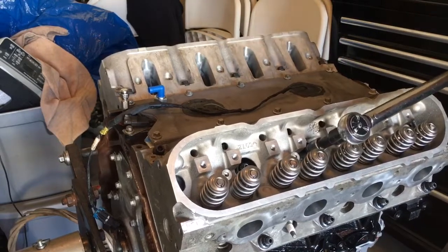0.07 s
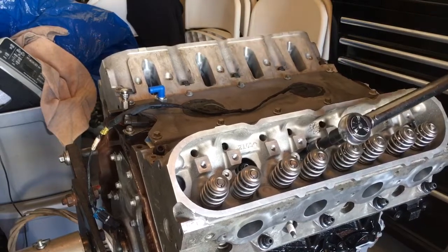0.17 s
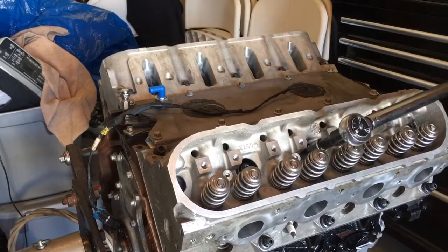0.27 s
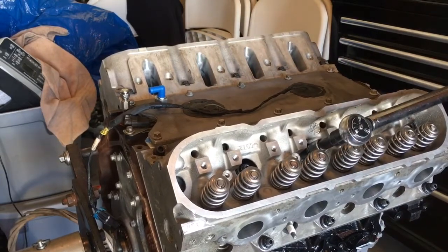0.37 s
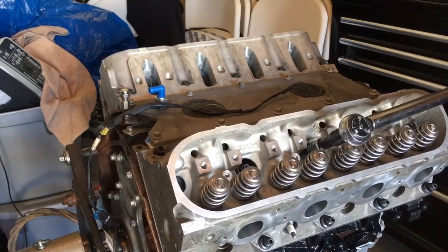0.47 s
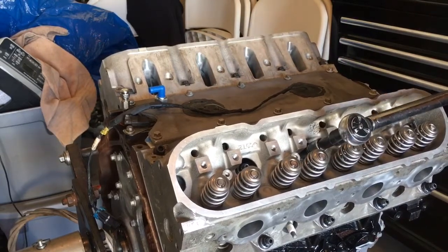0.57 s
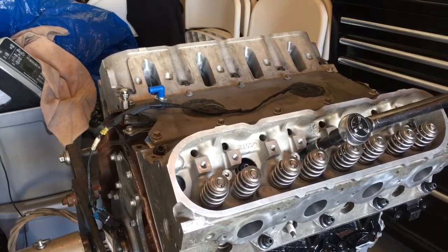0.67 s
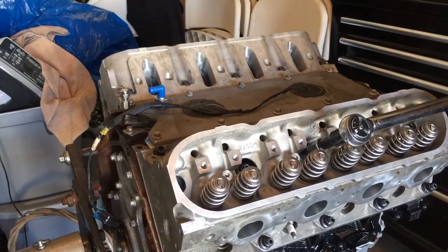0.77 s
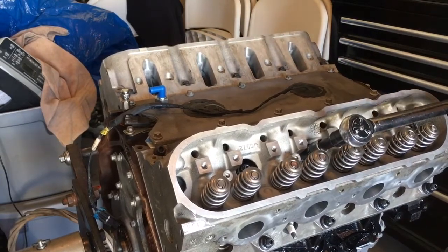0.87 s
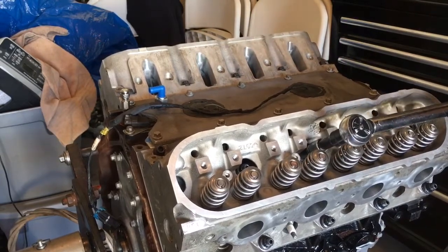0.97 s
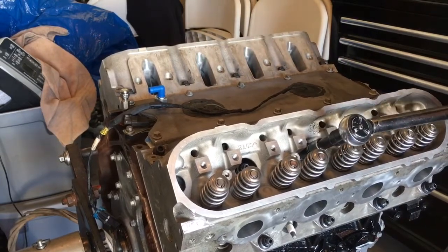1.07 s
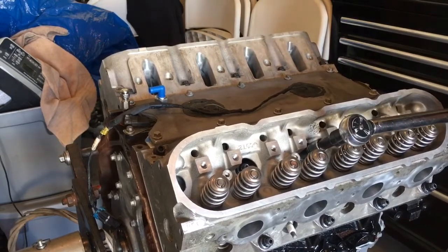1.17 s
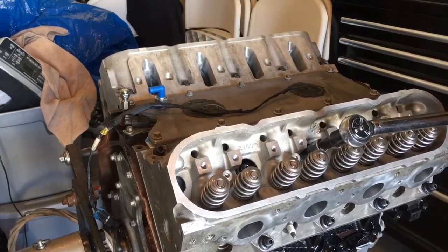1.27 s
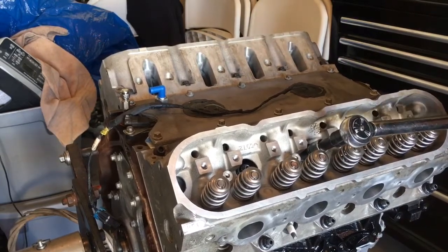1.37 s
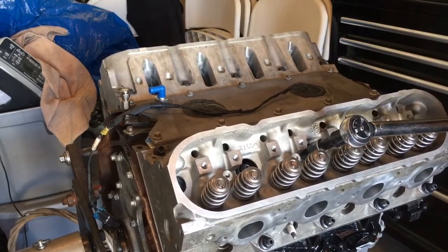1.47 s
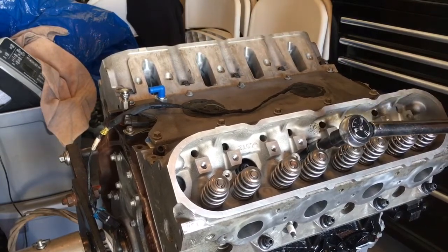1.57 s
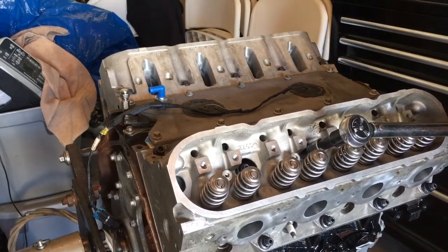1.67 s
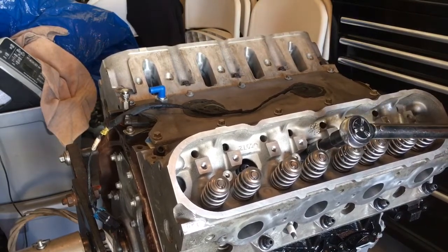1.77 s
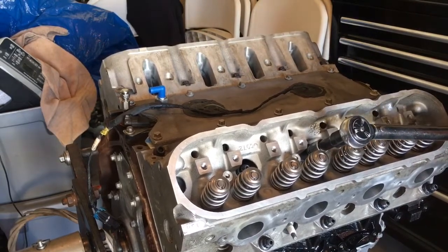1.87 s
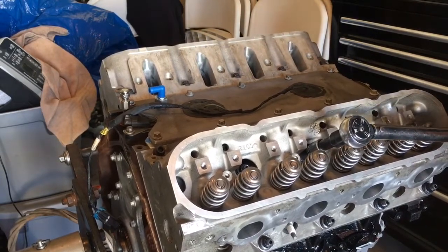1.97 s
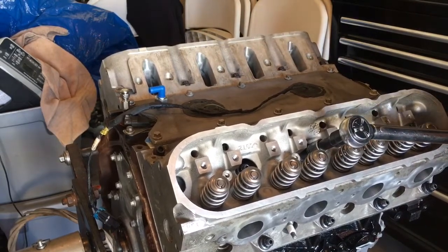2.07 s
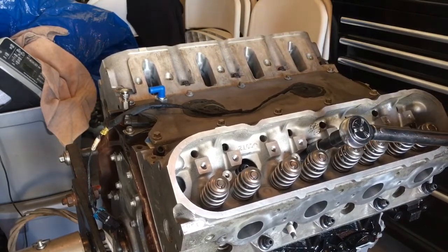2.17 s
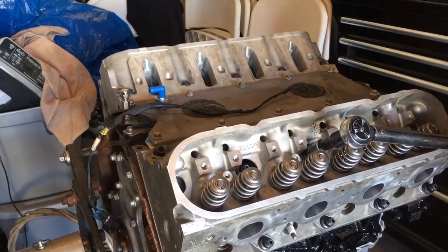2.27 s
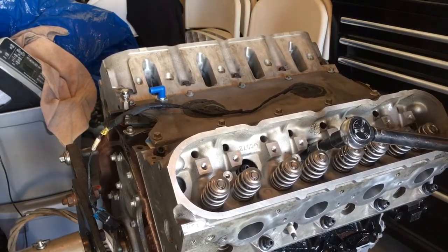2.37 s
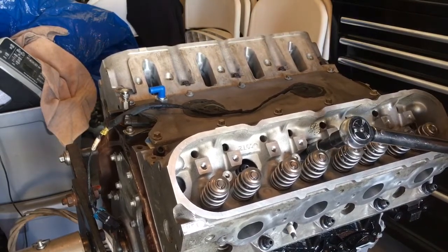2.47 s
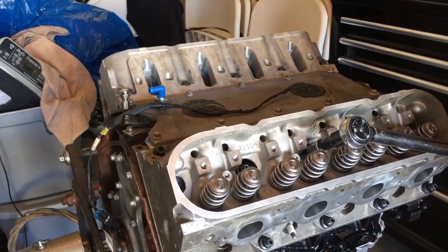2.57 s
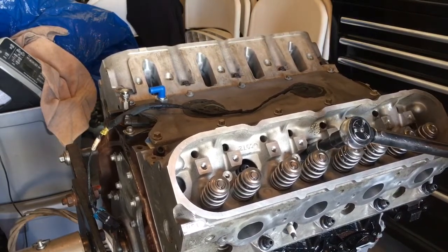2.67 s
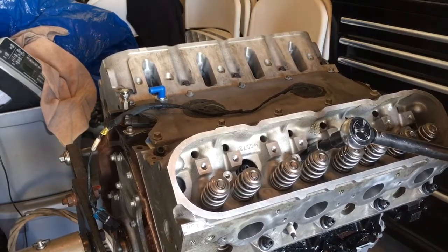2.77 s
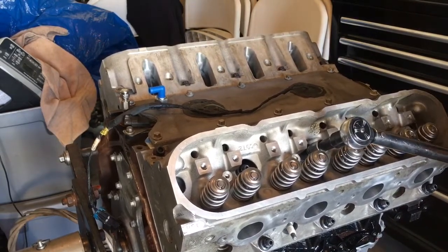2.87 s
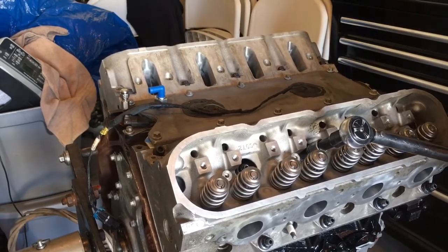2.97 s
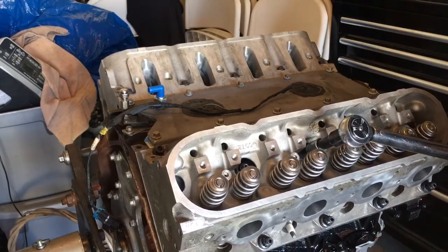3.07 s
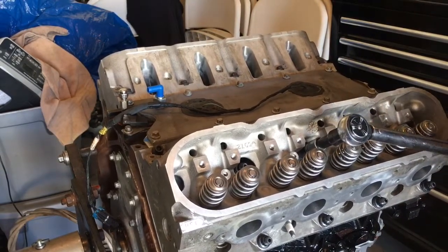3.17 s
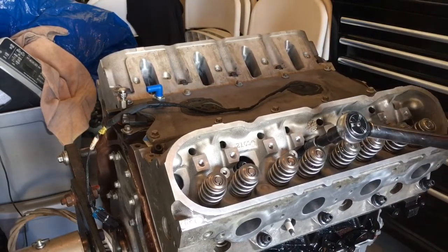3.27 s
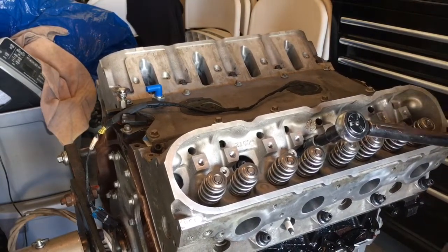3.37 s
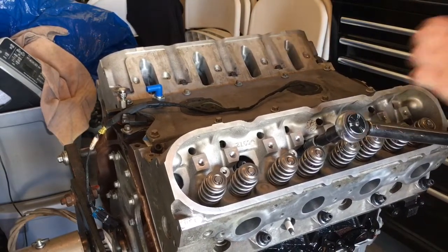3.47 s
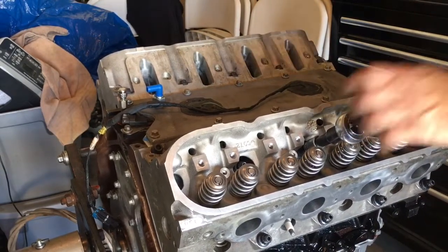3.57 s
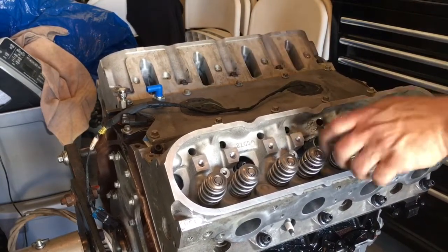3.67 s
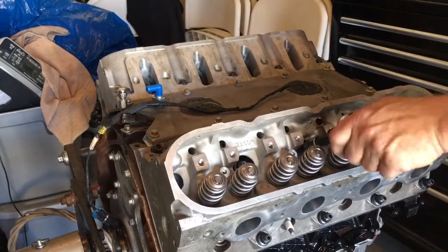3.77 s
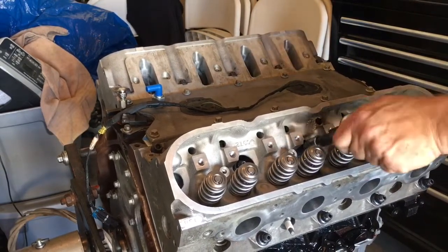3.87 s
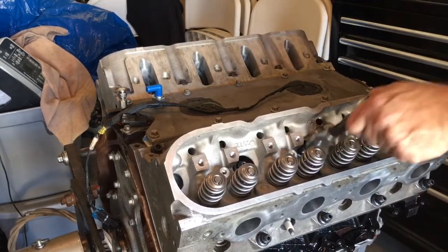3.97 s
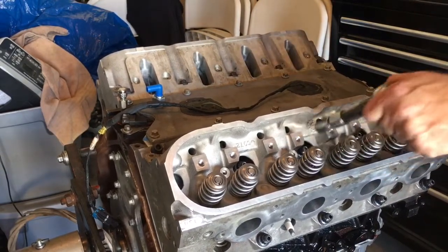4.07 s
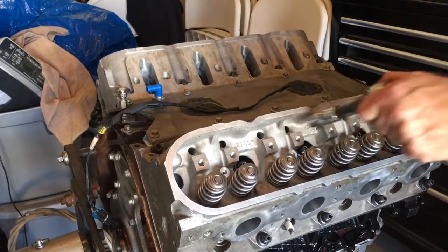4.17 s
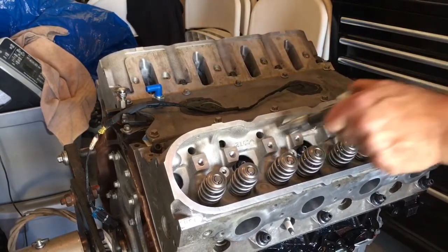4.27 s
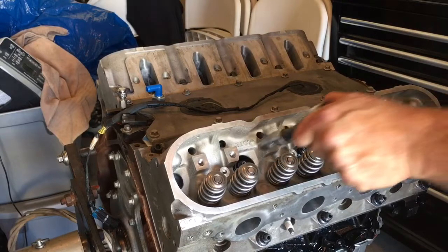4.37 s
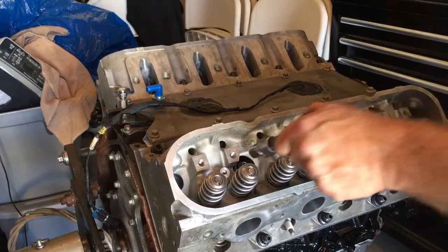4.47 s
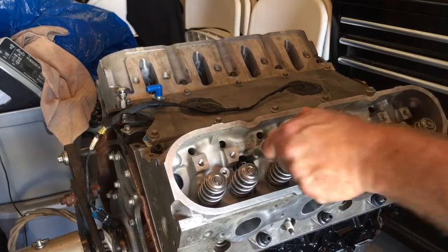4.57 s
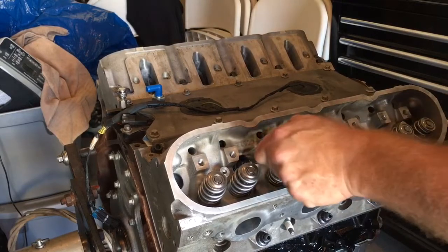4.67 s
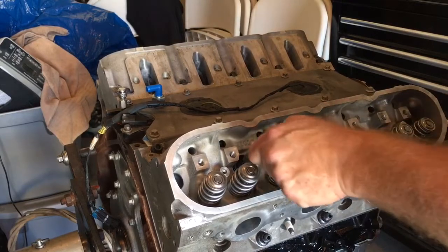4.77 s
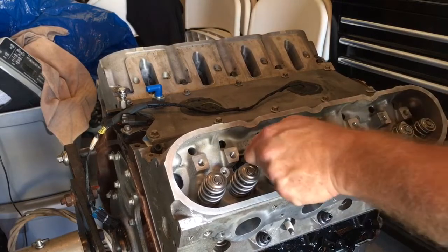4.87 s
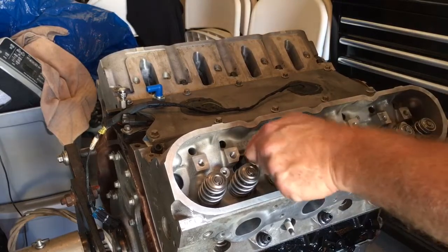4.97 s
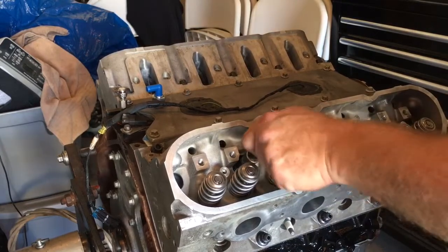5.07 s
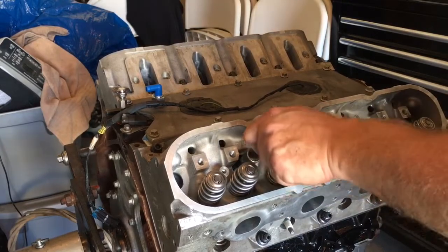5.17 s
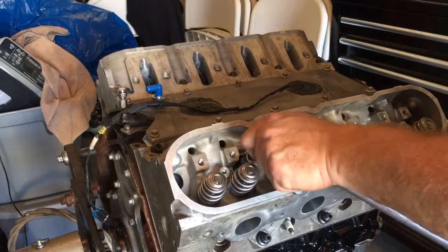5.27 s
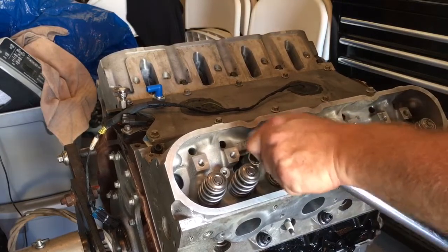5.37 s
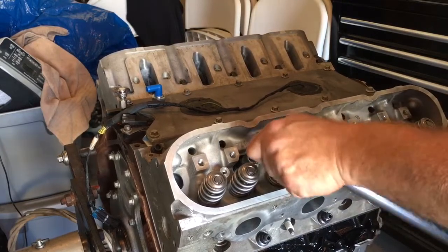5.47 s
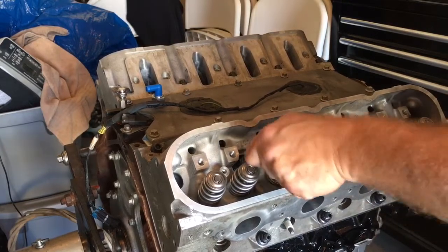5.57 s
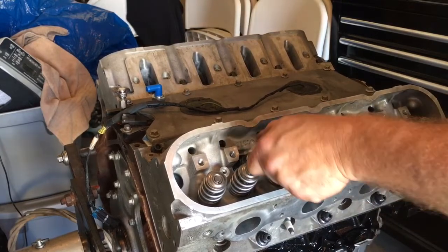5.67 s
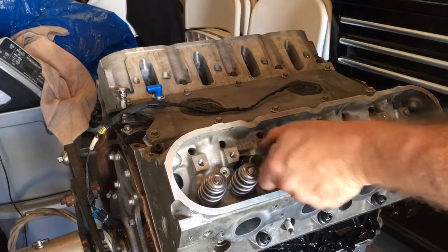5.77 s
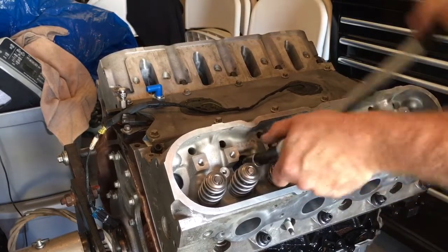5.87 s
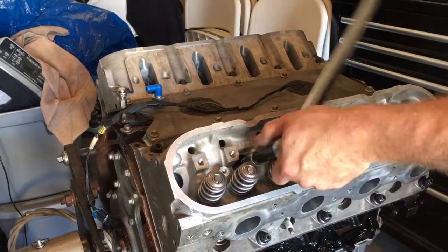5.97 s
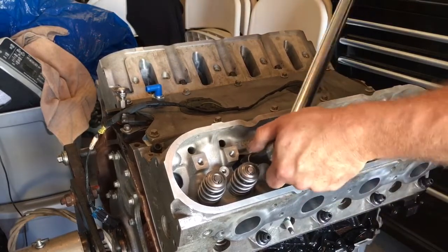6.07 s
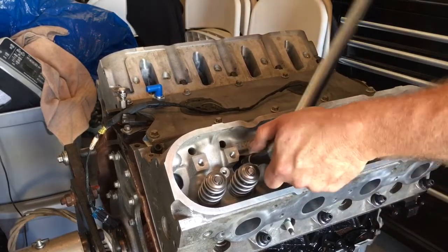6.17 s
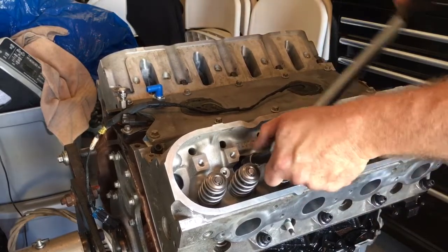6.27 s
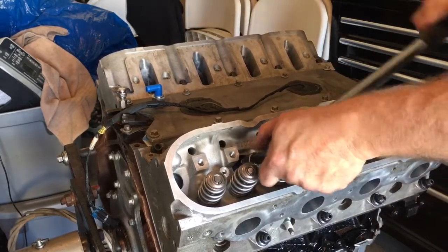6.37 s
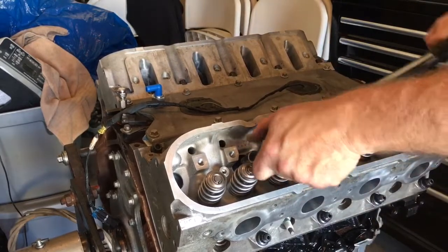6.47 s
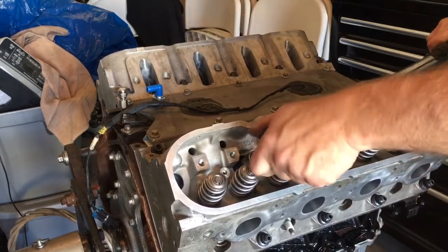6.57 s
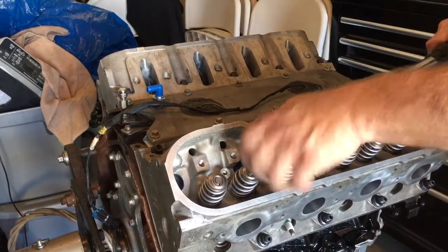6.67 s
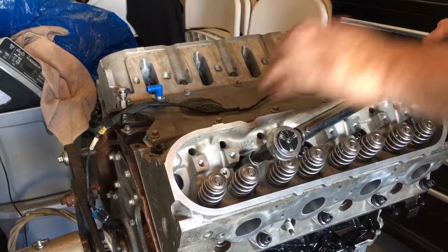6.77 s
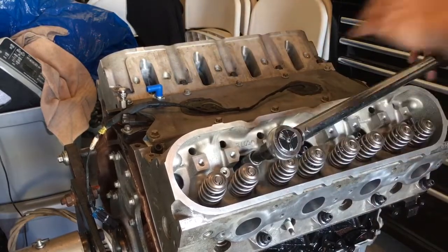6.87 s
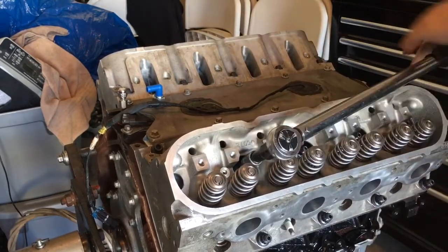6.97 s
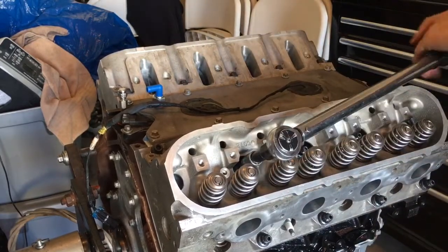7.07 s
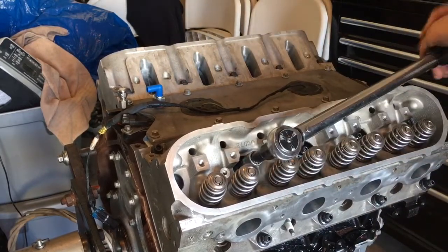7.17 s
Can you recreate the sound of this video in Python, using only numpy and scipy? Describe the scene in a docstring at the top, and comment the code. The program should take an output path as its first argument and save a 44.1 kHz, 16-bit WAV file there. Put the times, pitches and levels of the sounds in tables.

```python
"""In a garage, a low hum like an engine idling outside and a faint, high insect trill go on throughout.
At 2.8 s a click-type torque wrench, tightening a cylinder head bolt, gives way with a loud snap: its arm
slaps the inside of its steel tube. At 3.2 s it snaps back as the pull eases, and a soft hiss lingers.
From 3.7 s the socket knocks and scrapes as it is lifted off and slid onto the next bolt. At 5.8 s the
handle swings back, clicking over seven ratchet teeth. A few light rubs and a last knock follow."""
import sys
import numpy as np
from scipy import signal
from scipy.fft import rfft, irfft, next_fast_len
from scipy.io import wavfile
from scipy.ndimage import uniform_filter1d, map_coordinates

SR = 44100
rng = np.random.default_rng(int(sys.argv[2]) if len(sys.argv) > 2 else 0)


def log_audio(samples):
    """Write samples as a 16-bit WAV file to the path given in sys.argv[1]."""
    # one column per channel
    frames = np.atleast_2d(samples).T
    # limit to full scale, then quantise
    limited = np.clip(frames, -1, 1)
    pcm = np.round(limited * 32767).astype(np.int16)
    wavfile.write(sys.argv[1], SR, pcm)


N = 318402
TIME = np.arange(N) / SR
AGE = np.arange(SR // 2) / SR  # seconds since a hit

def amp(db):
    """Turn decibels into a gain."""
    return 10 ** (np.asarray(db) / 20)

def unit(x):
    """Scale a sound to an average (rms) level of 1."""
    return x / np.sqrt(np.mean(x ** 2) + 1e-20)

def along(points, hz):
    """Read between the rows of a (pitch, value) table, on a log pitch scale."""
    pitches, values = np.transpose(points)
    return np.interp(np.log(hz + 1), np.log(pitches + 1), values)

def fade(t, fade_s):
    """Die away by 60 dB every fade_s seconds."""
    return np.exp(-np.log(1000) * t / fade_s)

def swell(middle_s, length_s):
    """A flat-topped hill of height 1."""
    return np.exp(-(2 * (TIME - middle_s) / length_s) ** 4)

def wobble(rate):
    """A smooth curve through `rate` random values a second."""
    return map_coordinates(rng.standard_normal(int(N * rate / SR) + 4), [TIME * rate])

def filtered(x, response):
    """Turn each frequency up or down by the gain response(hz)."""
    size = next_fast_len(len(x) + SR // 4)
    hz = np.fft.rfftfreq(size, 1 / SR)
    return irfft(rfft(x, size) * response(hz), size)[:len(x)]

def noise(tone):
    """Noise of level 1, shaped by a (pitch_hz, level_db) table."""
    return unit(filtered(rng.standard_normal(N), lambda hz: amp(along(tone, hz))))

def band(centre_hz, width_hz):
    """Noise of level 1, gathered around one pitch."""
    peak = lambda hz: 1 / (1 + ((hz - centre_hz) / width_hz * 2) ** 2)
    return unit(filtered(rng.standard_normal(N), peak))

def tone_filter(tone, size=2048):
    """The promptest (minimum-phase) click of energy 1 with the shape tone(hz), in dB."""
    gain = np.maximum(amp(tone(np.fft.rfftfreq(size, 1 / SR))), 1e-6)
    cepstrum = irfft(np.log(gain))
    cepstrum[1:size // 2] *= 2
    cepstrum[size // 2 + 1:] = 0
    response = irfft(np.exp(rfft(cepstrum)))
    return response / np.linalg.norm(response)

def add(track, start_s, sound):
    """Mix a sound into the track."""
    part = track[round(start_s * SR):][:len(sound)]
    part += sound[:len(part)]

def clack(tone, fade_s, smooth_bins=41, rise_s=.0003, size=2048):
    """Steel hits steel: a burst of tiny impacts, evened out in tone and then shaped by tone(hz)."""
    burst = rng.choice([-1, 1], len(AGE)) * fade(AGE, fade_s) * (1 - np.exp(-AGE / rise_s))
    power = uniform_filter1d(np.abs(rfft(burst, size)) ** 2, size=smooth_bins)
    shaper = tone_filter(lambda hz: tone(hz) - 10 * np.log10(power))
    shaped = signal.fftconvolve(burst, shaper)[:len(AGE)]
    return shaped * np.linalg.norm(burst) / np.linalg.norm(shaped)

def ring(hz, fade_s, rise_s=.001):
    """One fading note of struck steel."""
    wave = np.sin(2 * np.pi * (hz * AGE + rng.random()))
    return wave * fade(AGE, fade_s) * (1 - np.exp(-AGE / rise_s))

# how long the garage echoes: pitch_hz, fade_s
ECHO_FADES = [(200, .36), (700, .33), (1700, .32), (4500, .33), (8000, .29), (12000, .28), (16000, .23)]
def garage(x, echo_db, build_s=.003):
    """Add the room's echo, which builds quickly after the sound and dies sooner in the treble."""
    hz, t, spectrum = signal.stft(rng.standard_normal(len(AGE)), SR, nperseg=256)
    spectrum = spectrum * fade(t, along(ECHO_FADES, hz)[:, None])
    tail = signal.istft(spectrum, SR)[1][:len(AGE)]
    tail *= 1 - np.exp(-(AGE / build_s) ** 2)
    return x + amp(echo_db) * signal.fftconvolve(x, tail / np.linalg.norm(tail))[:len(x)]

# tone of the room's steady noise: pitch_hz, relative_db
AIR_TONE = [(100, -25), (200, -5), (330, -2), (450, -11), (750, -15), (1100, -15.5), (1950, -17.5),
            (2400, -23), (3800, -23.5), (4800, -30), (6500, -32.5), (8500, -37), (11000, -40), (16000, -43)]
# faint whirring: pitch_hz, width_hz, level_db
WHIRRS = [(280, 22, -69.5), (626, 18, -76), (3450, 400, -81)]
def room_air(air_db=-60.5, whine_db=-77.5, swell_db=4):
    """Steady noise, some whirring and a faint whine that swells once."""
    whirr = sum(amp(db) * band(hz, width_hz) for hz, width_hz, db in WHIRRS)
    whine_gain = amp(whine_db + swell_db * swell(middle_s=1.5, length_s=1.4))
    whine = whine_gain * band(centre_hz=2040, width_hz=90)
    return amp(air_db) * noise(AIR_TONE) + whirr + whine

def insect(level_db=-80, tiring_db_per_s=-.4, flutter_db=2, trill_s=.12, gap_s=.235, slowing=.015):
    """Thin, distant trills in a loose rhythm that slowly grows sparser and fainter."""
    middle_s, trills = trill_s, np.zeros(N)
    for gap_scale, length_scale in np.exp(.18 * rng.standard_normal((32, 2))):
        trills = np.maximum(trills, swell(middle_s, trill_s * length_scale))
        middle_s += gap_scale * (gap_s + slowing * middle_s)
    gain = amp(level_db + tiring_db_per_s * TIME + flutter_db * wobble(25))
    return gain * trills * band(centre_hz=9750, width_hz=480)

# notes of the engine's hum: cycles_per_turn, level_db
HUM_NOTES = [(4, -48.5), (4.5, -57), (5, -52), (6, -60), (7, -66), (8, -56), (10, -66), (12, -55.5),
             (12.5, -66), (15, -68), (17, -73), (21, -73), (24.5, -71)]
# tone of its rumble: pitch_hz, relative_db
RUMBLE_TONE = [(20, -20), (32, -9), (48, 0), (80, -2), (130, 0), (170, -4), (210, -14), (400, -35),
               (1000, -100)]
def idling_engine(turns_per_s=11.3, drift=.008, flutter_db=2, rumble_db=-54.5):
    """A slowly turning crankshaft makes low notes that throb against each other over a soft rumble."""
    turns = np.cumsum(turns_per_s * (1 + drift * wobble(2))) / SR
    hum = np.zeros(N)
    for cycles, db in HUM_NOTES:
        gain = amp(db + flutter_db * wobble(4))
        hum += gain * np.sin(2 * np.pi * (cycles * turns + rng.random()))
    return np.sqrt(2) * hum + amp(rumble_db) * noise(RUMBLE_TONE)

# tone of steel rubbing steel: pitch_hz, relative_db
SCRAPE_TONE = [(290, -41), (500, -11), (868, -9), (1060, -2), (1260, -8), (1720, -5), (3860, -8),
               (12000, -19), (16000, -27)]
# strokes of the socket: peak_s, level_db, rise_s, fall_s
STROKES = [(3.89, -62, .025, .04), (3.985, -61, .04, .03), (4.205, -63, .015, .035), (4.67, -62, .02, .03),
           (4.803, -52, .07, .033), (6.14, -60, .025, .025), (6.385, -57.5, .022, .018),
           (6.555, -64, .008, .03), (6.65, -64, .012, .03)]
def socket_scrapes(grit_db=4):
    """The socket rubs over the bolt head, catching on its roughness; each stroke presses and lets go."""
    rub = unit(noise(SCRAPE_TONE) * amp(grit_db * wobble(350)))
    pressure = np.zeros(N)
    for peak_s, db, rise_s, fall_s in STROKES:
        width_s = np.where(TIME < peak_s, rise_s, fall_s)
        pressure += amp(db) * np.exp(-((TIME - peak_s) / width_s) ** 2)
    return garage(pressure * rub, echo_db=-3)

# tone of a knock: pitch_hz, relative_db
KNOCK_TONE = [(150, -8), (400, -4), (800, -4), (1200, 0), (1750, 2), (2300, -5), (3300, 0), (4600, -3),
              (5600, 3), (7300, -4), (8300, 0), (10500, -5), (12000, -4), (16000, -11)]
# notes of the loose socket: pitch_hz, relative_db, fade_s
SOCKET_NOTES = [(1700, -26, .15), (5330, -25, .16), (5900, -26, .14), (8170, -28, .17)]
# knocks on bolt and cylinder head: start_s, level_db, centre_hz, fade_s, bounce_after_s
SOCKET_KNOCKS = [(3.7130, -38, 380, .035, .016), (3.7268, -46, 6000, .03, .004),
                 (3.9335, -35, 11000, .008, .0105), (3.9460, -41, 1600, .018, .02),
                 (3.9880, -35.5, 4500, .011, .02), (4.6995, -39, 3400, .007, .008),
                 (4.7063, -34.5, 3400, .018, .0097), (4.8751, -41, 3400, .008, .002),
                 (4.9527, -26, 5200, .005, .001), (4.9586, -23, 4800, .01, .0024),
                 (5.5516, -45, 3200, .018, .008), (5.9800, -43, 2200, .015, .003),
                 (7.1600, -29, 2800, .007, .002)]
def socket_knocks(db_per_octave=9, bounce_db=-5, scatter_db=2, softness=.05):
    """The socket knocks, rings and bounces once. Each knock has its own pitch; long ones start gently."""
    out = np.zeros(N)
    for start_s, db, centre_hz, fade_s, bounce_s in SOCKET_KNOCKS:
        # a rounded peak at centre_hz
        focus = lambda hz: -db_per_octave * np.hypot(np.log2((hz + 1) / centre_hz), .5)
        for delay_s, loss_db in [(0, 0), (bounce_s, bounce_db)]:
            knock = clack(lambda hz: along(KNOCK_TONE, hz) + focus(hz), fade_s, rise_s=softness * fade_s)
            clink = sum(amp(note_db + focus(hz) / 2 + scatter_db * rng.standard_normal()) * ring(hz, ring_s)
                        for hz, note_db, ring_s in SOCKET_NOTES)
            add(out, start_s + delay_s, amp(db + loss_db) * garage(knock + clink, echo_db=-4))
    return out

# thin, high pings: start_s, level_db, pitch_hz, fade_s
SOCKET_PINGS = [(3.9660, -49, 15740, .21), (4.8751, -53, 15140, .09)]
def socket_pings():
    """The socket rings as it springs free or catches."""
    out = np.zeros(N)
    for start_s, db, hz, fade_s in SOCKET_PINGS:
        add(out, start_s, amp(db) * ring(hz, fade_s, rise_s=.012))
    return out

# tone of the pawl, the ratchet's little catch: pitch_hz, relative_db
PAWL_TONE = [(300, -25), (1000, -15), (1450, -13), (1850, -6), (2700, -14), (3900, -7), (4700, -9),
             (5500, -2), (6800, 0), (8800, -3), (10400, -14), (13000, -10), (16000, -16)]
# one click for each tooth: start_s, level_db, lower_hz, upper_hz
TOOTH_CLICKS = [(5.7828, -30, 6600, 9200), (5.8128, -35, 6300, 8600), (5.8487, -27, 6050, 7900),
                (5.8852, -31.5, 5700, 8400), (5.9256, -31.5, 5400, 6600), (5.9705, -33, 5350, 7650),
                (6.0332, -27.5, 6350, 8250)]
def ratchet(lower_db=10, upper_db=7, width_hz=190):
    """Each tooth flicks the pawl, whose two ringing pitches shift as it rides over the wheel."""
    out = np.zeros(N)
    bump = lambda hz, centre_hz: 1 / (1 + ((hz - centre_hz) / width_hz) ** 2)
    for start_s, db, lower_hz, upper_hz in TOOTH_CLICKS:
        peaks = lambda hz: lower_db * bump(hz, lower_hz) + upper_db * bump(hz, upper_hz)
        click = clack(lambda hz: along(PAWL_TONE, hz) + peaks(hz), fade_s=.012)
        add(out, start_s, amp(db) * garage(click, echo_db=-3))
    return out

def lingering_hiss(level_db=-64.5, linger_s=.41, edge_s=.02):
    """A soft hiss starts with the wrench's first snap and stops a little after the second."""
    start_s, end_s = GIVE_WAY[0], SNAP_BACK[0] + linger_s
    gate = np.clip(np.minimum(TIME - start_s, end_s - TIME) / edge_s, 0, 1)
    return amp(level_db) * gate * noise([(300, 0), (4000, 0), (9000, -3), (16000, -7)])

# the two snaps: start_s, level_db, fade_s, echo_db
GIVE_WAY = (2.7914, -6.7, .025, -2)
SNAP_BACK = (3.2020, -14.5, .03, -1)
# their tones: pitch_hz, relative_db
GIVE_WAY_TONE = [(80, -36), (300, -15), (480, -13), (800, -11), (1250, -13.5), (1600, -5), (2300, -1.5),
                 (2850, -6), (3400, -2), (4600, 0), (5900, -8), (8300, -2.5), (10000, -9), (12700, -4),
                 (13600, -15), (15500, -10)]
SNAP_BACK_TONE = [(80, -26), (250, -10), (480, -15), (720, -9), (1150, -16), (1700, -1), (2400, -3),
                  (3000, -10), (3500, -3), (4400, -8), (5400, -6), (6600, -6), (7600, -13), (11300, -8.5),
                  (13500, -25), (16000, -29)]
# notes of the steel tube and socket: pitch_hz, give_way_relative_db, snap_back_relative_db, fade_s
TUBE_NOTES = [(727, -50, -48, .2), (1647, -40, -30.5, .36), (1708, -36, -33, .36), (2184, -36, -41, .25),
              (2431, -30, -40, .23), (2943, -35, -48, .23), (3368, -30, -37, .26), (4332, -32, -48, .33),
              (4383, -32, -49, .37), (4494, -32, -49, .39), (4733, -33, -48, .32), (5200, -39, -41, .32),
              (6190, -38, -40, .22), (6880, -38, -44, .3), (8393, -39, -52, .26), (10815, -33, -33.5, .25),
              (10993, -37, -42, .2), (11200, -42, -42, .24), (12660, -37, -56, .26), (13347, -43, -62, .24)]
# tick of the pivot block inside the wrench: start_s, level_db, pitch_hz, fade_s
BLOCK_TICK = (3.2026, -2, 5400, .009)
def torque_wrench(tube_db=-3):
    """The arm slaps its tube twice, making it ring; the second time, the block drops into its seat."""
    out = np.zeros(N)
    for which, (snap, tone) in enumerate([(GIVE_WAY, GIVE_WAY_TONE), (SNAP_BACK, SNAP_BACK_TONE)]):
        start_s, db, fade_s, echo_db = snap
        slap = clack(lambda hz: along(tone, hz), fade_s, smooth_bins=21)
        add(out, start_s, amp(db) * garage(slap, echo_db))
        tube = sum(amp(levels_db[which]) * ring(hz, ring_s) for hz, *levels_db, ring_s in TUBE_NOTES)
        add(out, start_s, amp(tube_db) * garage(tube, echo_db=-9))
    start_s, db, hz, fade_s = BLOCK_TICK
    add(out, start_s, amp(db) * garage(ring(hz, fade_s, rise_s=.0004), echo_db=-14))
    return out

def scene():
    """The tool and its background, mixed into one channel."""
    tool = torque_wrench() + ratchet() + socket_knocks() + socket_pings() + socket_scrapes()
    background = idling_engine() + room_air() + lingering_hiss() + insect()
    return (tool + background)[None]

def record(dry, top_hz=15800):
    """Cut away the very highest treble."""
    low_pass = lambda hz: 1 / np.sqrt(1 + (hz / top_hz) ** 200)
    return np.array([filtered(channel, low_pass) for channel in dry])

dry = scene()
out = record(dry)
log_audio(out)
```